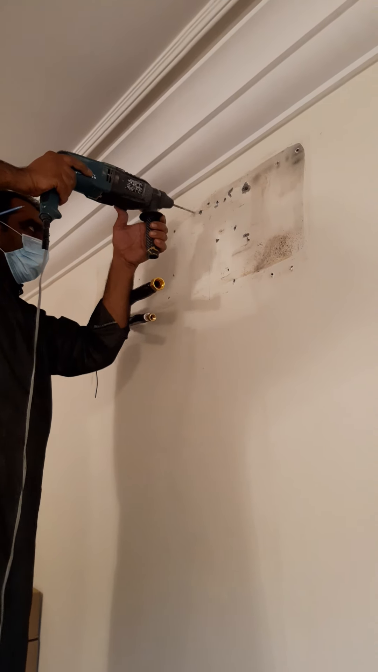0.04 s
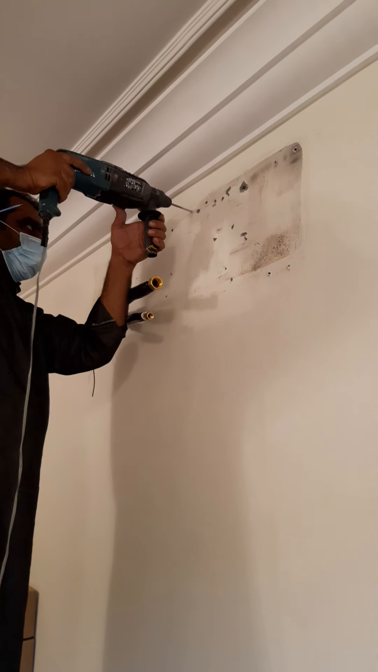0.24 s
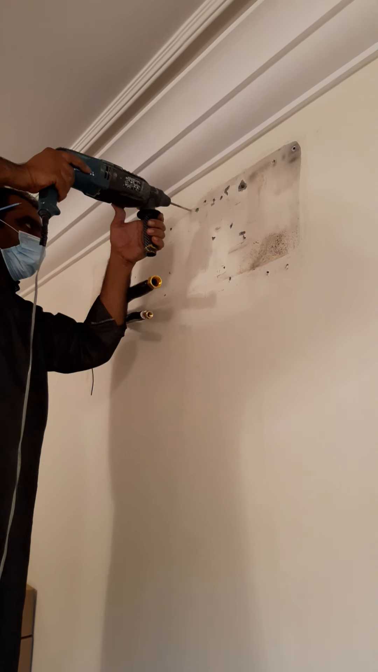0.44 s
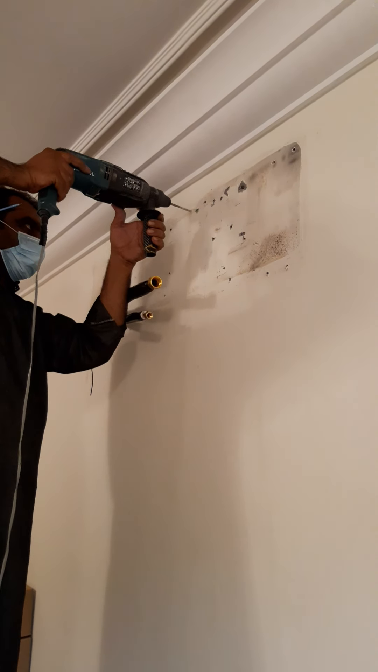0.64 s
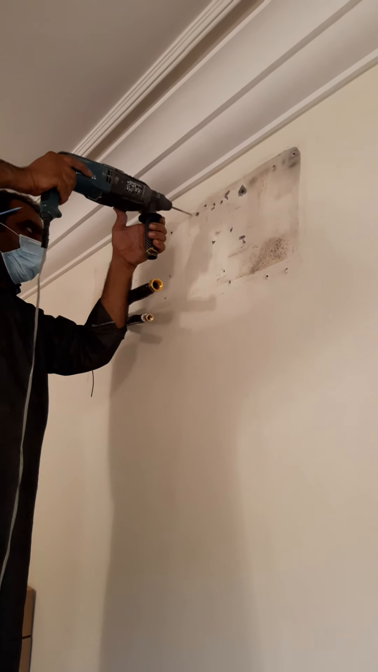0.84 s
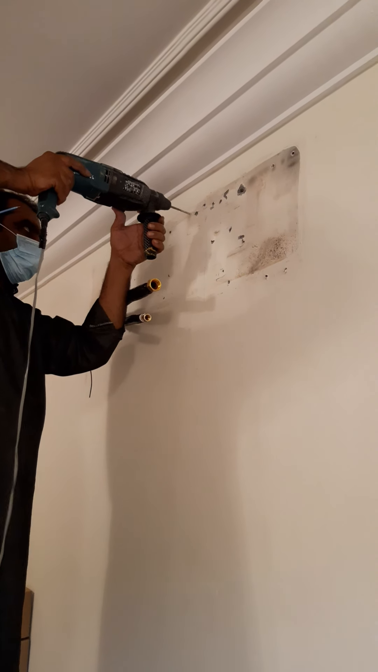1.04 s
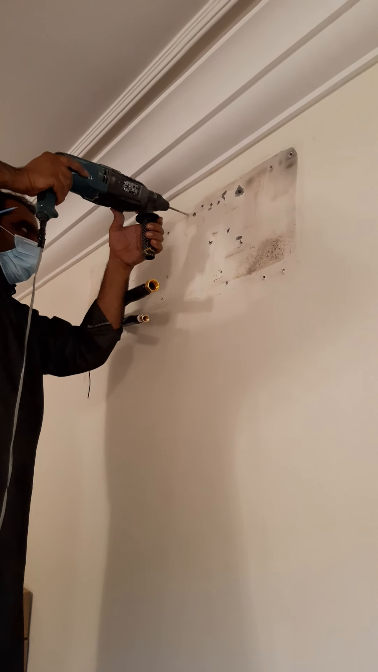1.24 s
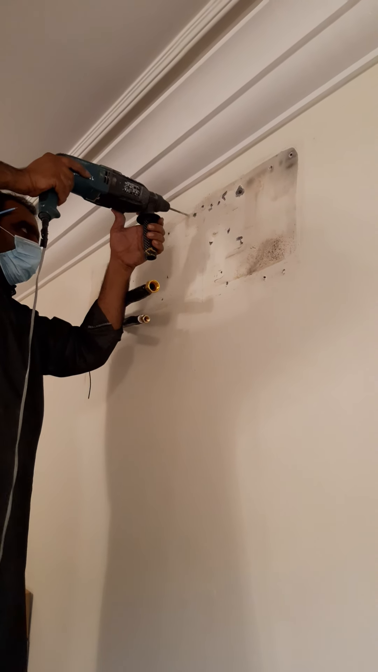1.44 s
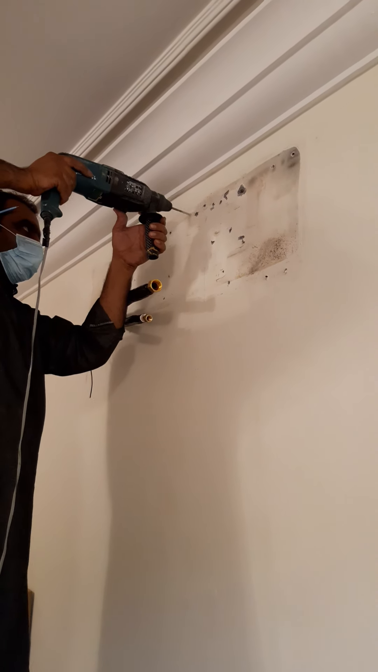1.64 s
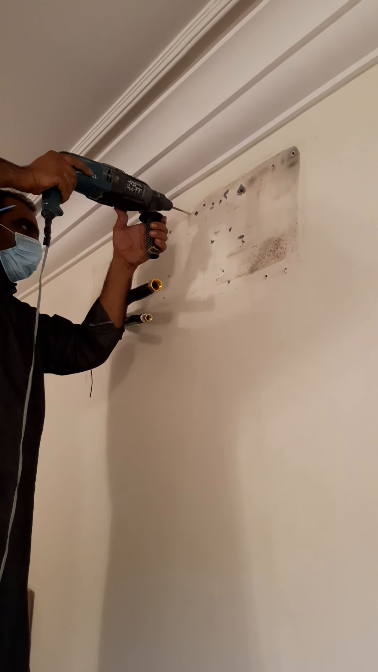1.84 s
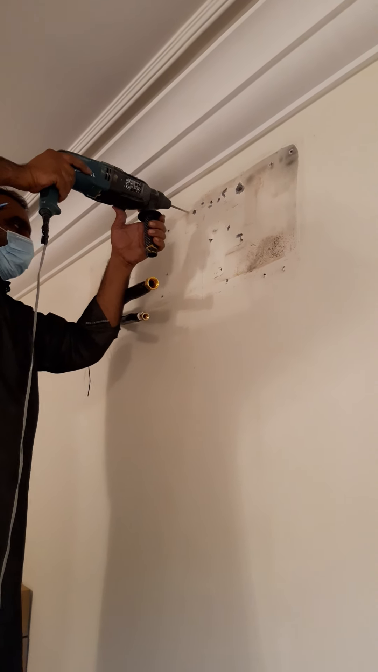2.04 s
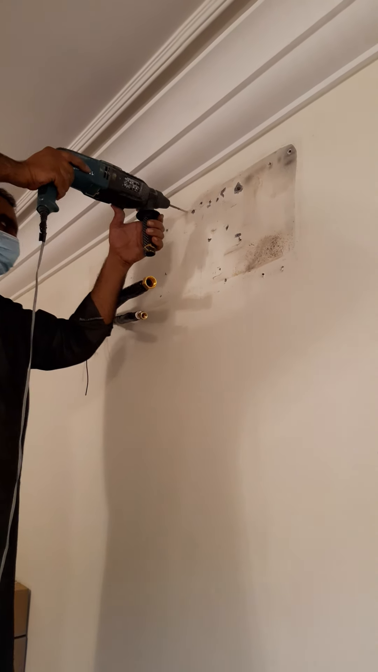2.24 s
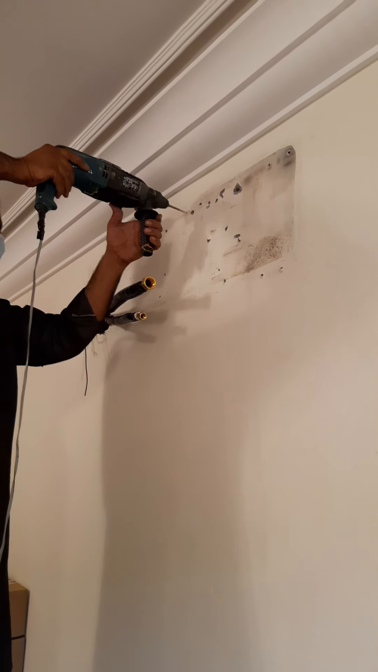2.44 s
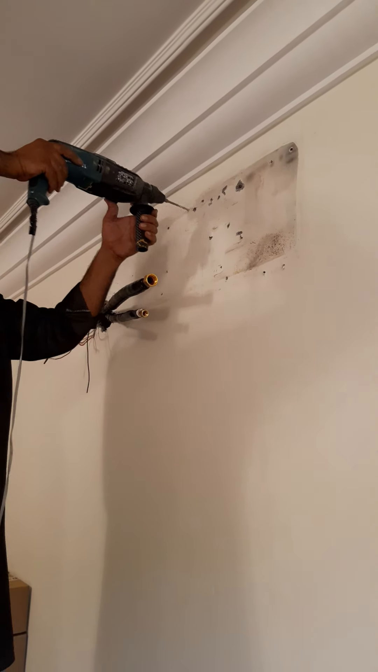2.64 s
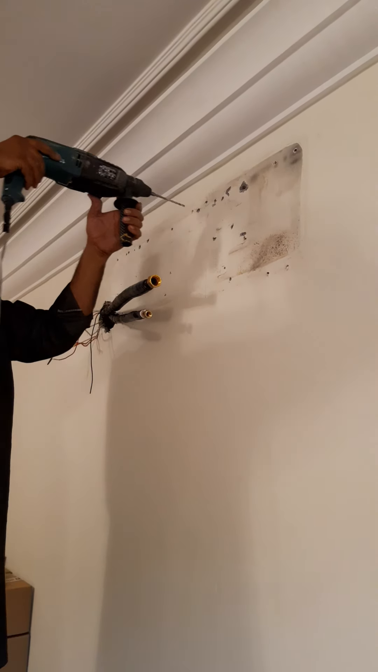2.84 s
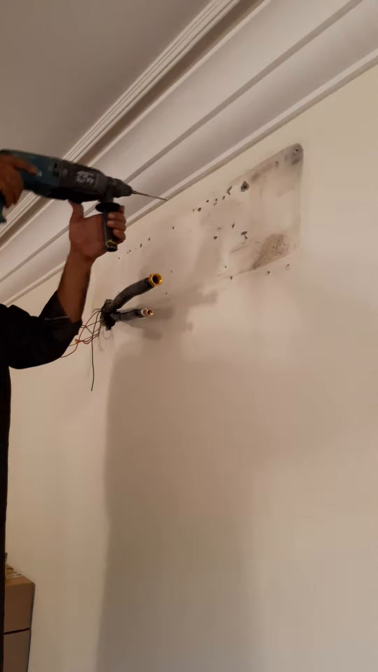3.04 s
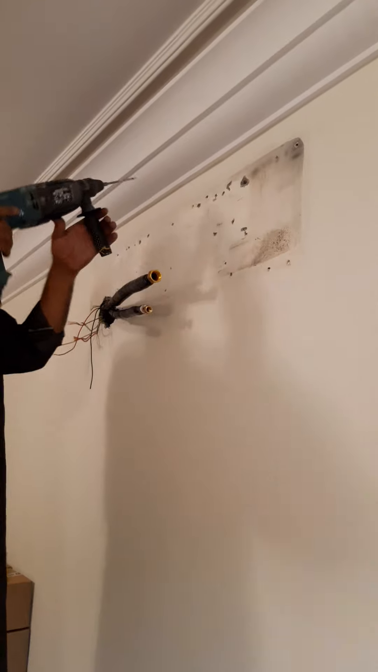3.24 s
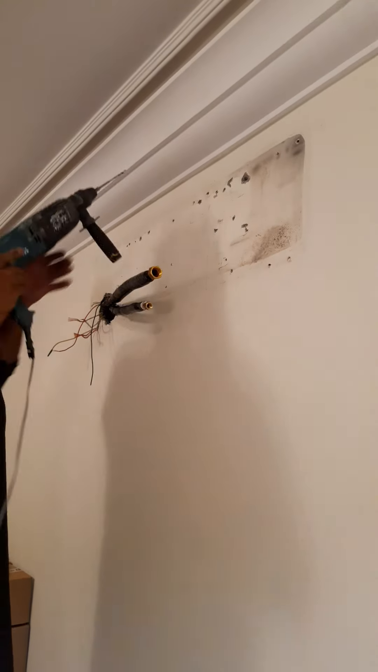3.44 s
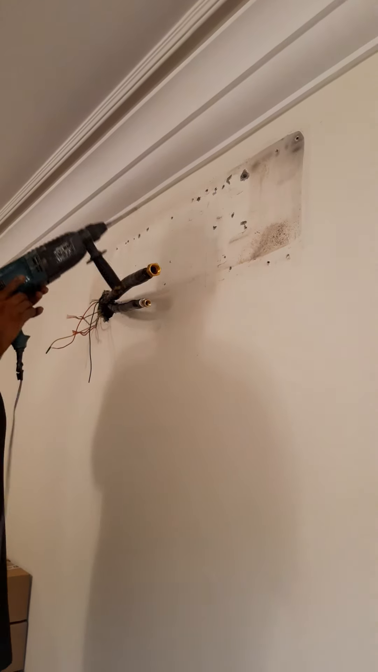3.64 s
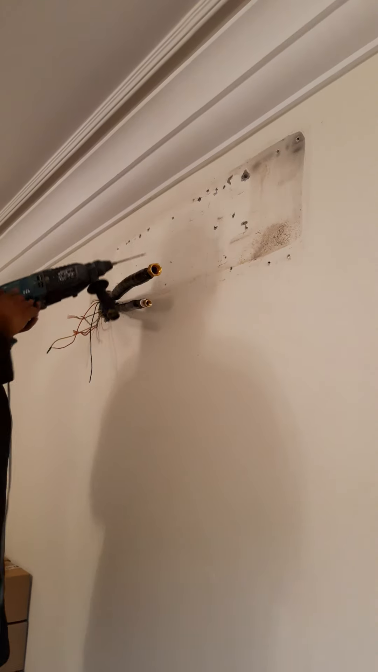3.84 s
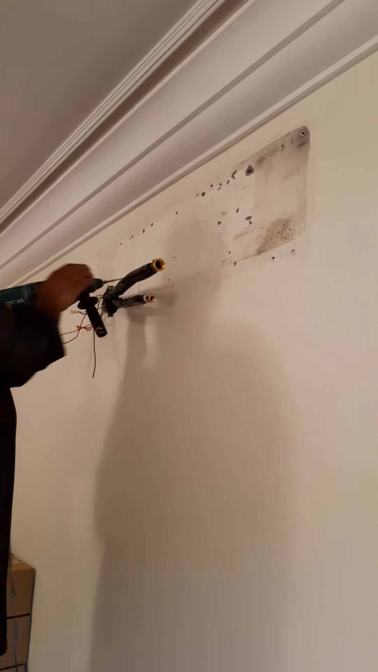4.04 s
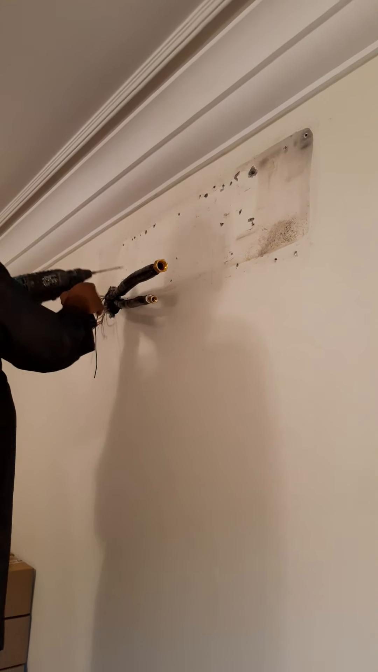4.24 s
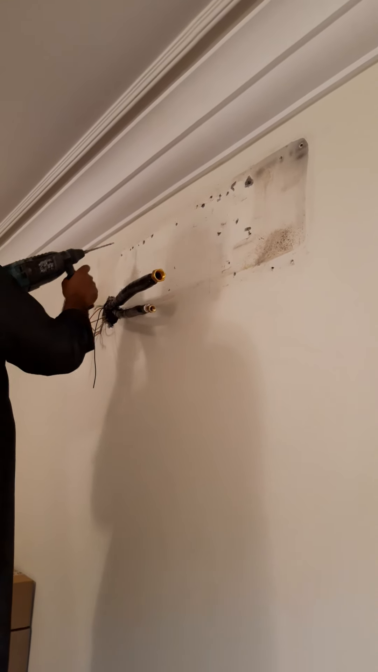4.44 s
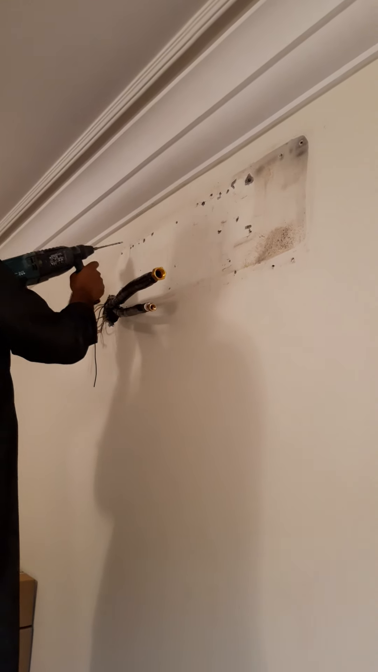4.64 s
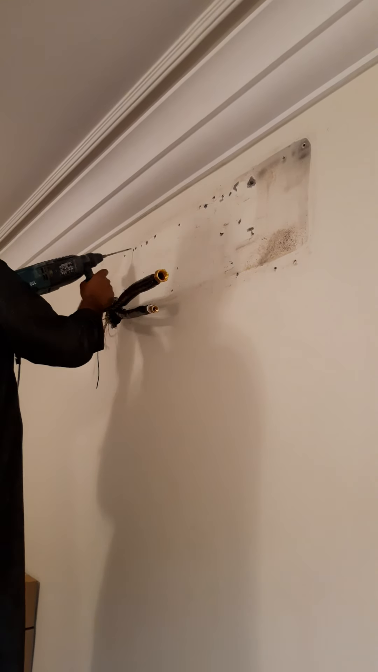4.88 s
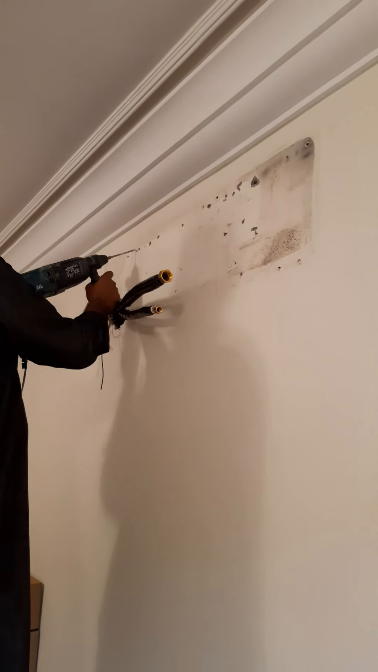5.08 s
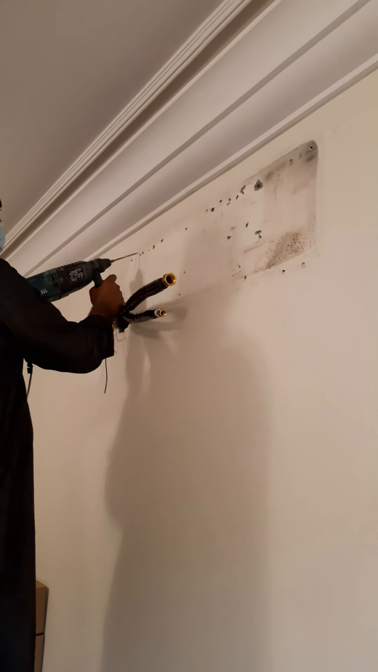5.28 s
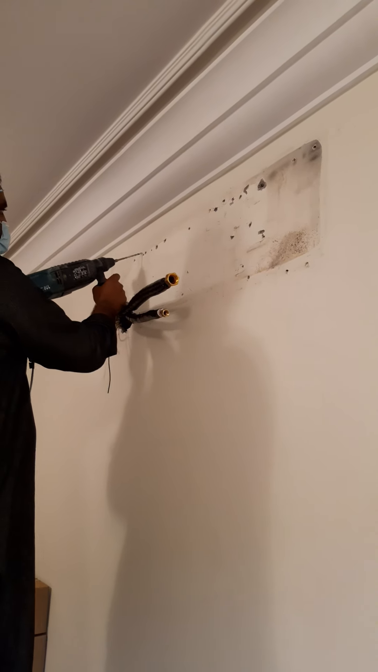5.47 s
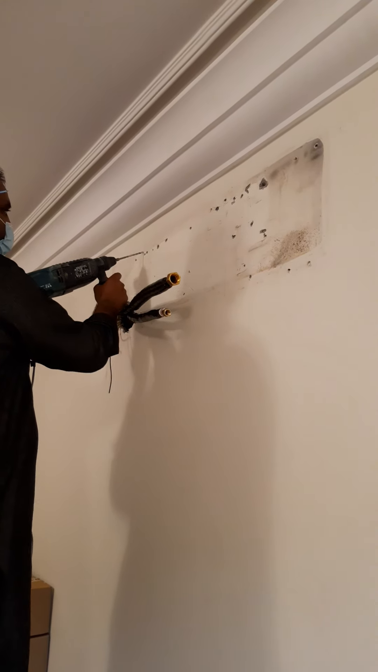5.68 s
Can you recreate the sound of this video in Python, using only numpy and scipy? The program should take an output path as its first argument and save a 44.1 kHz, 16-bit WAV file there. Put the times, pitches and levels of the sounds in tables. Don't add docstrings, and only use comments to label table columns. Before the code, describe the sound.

Loud rattling masonry drilling for about two and a half seconds, a trigger click, a falling motor whirr, then faint footwork on a hard floor.

```python
import sys
import numpy as np
from scipy import signal
from scipy.fft import rfft, irfft, next_fast_len
from scipy.io import wavfile
from scipy.ndimage import map_coordinates

SR = 44100
rng = np.random.default_rng(int(sys.argv[2]) if len(sys.argv) > 2 else 0)


def invert_db(level):
    return 10 ** (np.asarray(level, dtype=float) / 20)


def master(y):
    cut = np.clip(np.atleast_2d(y).T, -1, 1)
    pcm = np.round(cut * 32767)
    wavfile.write(sys.argv[1], SR, pcm.astype(np.int16))


N = 251811
T = np.arange(N) / SR
RELEASE_S = 2.45
RELEASE_HZ = 61
LINGER_S = 0.68
PANEL_HZ = 246.2


def unit(x):
    return x / np.sqrt(np.mean(x ** 2) + 1e-20)


def along(points, hz):
    f, v = np.transpose(points)
    return np.interp(np.log(hz + 1), np.log(f + 1), v)


def curves(rows):
    s, *cols = np.transpose(rows)
    return [np.interp(T, s, c) for c in cols]


def wobble(rate):
    coarse = T[::32]
    knots = rng.standard_normal(int(N * rate / SR) + 4)
    return np.interp(T, coarse, map_coordinates(knots, [coarse * rate]))


def noise(*shape):
    return rng.standard_normal(shape)


def filtered(x, response):
    n = x.shape[-1]
    m = next_fast_len(n + 8192)
    return irfft(rfft(x, m) * response(np.fft.rfftfreq(m, 1 / SR)), m)[..., :n]


# (pitch_hz, likeness 0 to 1)
PORT_LIKENESS = [(40, 0.43), (130, 0.88), (300, 0.76), (640, 1), (1400, 0.23), (3000, 0.14), (15000, .12)]
# (pitch_hz, left_minus_right_db)
DRILL_LEAN = [(60, -5), (110, -7.5), (200, -0.5), (380, -1.5), (700, -0.5), (1290, -6.5), (2380, -5),
              (4400, -2), (8120, 2.5), (15000, 4)]


def ports(pair, lean=DRILL_LEAN, lead=0.000257):
    def mix(hz):
        turn = np.arccos(np.clip(along(PORT_LIKENESS, hz), 0, 1)) / 2
        return np.array([np.cos(turn), np.sin(turn)])

    side = np.array([[1], [-1]])

    def place(hz):
        return invert_db(side * along(lean, hz) / 2) * np.exp(1j * np.pi * side * lead * hz)

    a, b = filtered(pair, mix)
    return filtered(np.array([a + b, a - b]), place)


# (pitch_hz, time_to_die_60_db_s)
ROOM_RING = [(150, 0.85), (1000, 0.78), (3000, 0.67), (7000, .5), (15000, .3)]


def room(x, direct_db):
    hz, t, z = signal.stft(noise(2, 2 * SR // 3), SR, nperseg=256)
    fade = invert_db(-60 * t / along(ROOM_RING, hz)[:, None])
    tail = signal.istft(z * fade, SR, nperseg=256)[1]
    build_up = np.clip(np.arange(tail.shape[1]) / SR / 0.0048, 0, 1)
    tail = tail / np.linalg.norm(tail[0]) * build_up
    tail[:, 0] = invert_db(direct_db)
    return signal.fftconvolve(x[None], tail, axes=1)


# (start_s, four_times_blow_rate_hz, push_db)
HAMMERING = [(0.0, 244.9, -16.5), (0.33, 246.4, -17), (0.48, 251.2, -16), (0.78, 255.3, -17),
             (0.99, 255.3, -17), (1.36, 251.4, -16.5), (1.52, 244.9, -17), (2.33, 249.2, -17),
             (2.45, 244.2, -17)]


def hammering():
    return curves(HAMMERING)


def coasting():
    drag_s, rub_hz = .87, 26
    slowing = np.exp(-np.clip(T - RELEASE_S, 0, 9) / drag_s)
    return np.clip((RELEASE_HZ + rub_hz) * slowing - rub_hz, 0, None)


def pressing():
    return invert_db(-60 * np.clip(T - RELEASE_S, 0, 9) / LINGER_S)


# (middle_s, dip_db, half_length_s)
GRIP_LOSSES = [(0.092, -2.5, 0.038), (.28, -1.5, 0.021), (.435, -3.5, 0.017), (0.608, -0.5, 0.019),
               (0.819, -1.5, 0.052), (0.992, -2, .025), (1.437, -6, 0.011), (1.54, -1, 0.063),
               (1.703, -1.5, 0.015), (1.937, -1, 0.022), (2.086, -3, 0.028), (2.434, -3.5, .02),
               (2.484, -2.5, .01)]


def slips():
    return sum(db * np.exp(-np.square(np.square((T - s) / half))) for s, db, half in GRIP_LOSSES)


def loudness(hammer_db, slip_share, fade_speed, coast_db, speed_power, extra_db=0):
    push_db = hammering()[1]
    spin = (T > RELEASE_S) * invert_db(2 * coast_db) * (coasting() / RELEASE_HZ) ** (2 * speed_power)
    keep = invert_db(-120 * fade_speed / LINGER_S / SR)
    spin = signal.lfilter([1 - keep], [1, -keep], spin)
    hammer = invert_db(2 * (push_db + hammer_db + extra_db)) * pressing() ** (2 * fade_speed)
    return invert_db(slip_share * slips()) * np.sqrt(hammer + spin)


# (pitch_hz, width_hz, level_db)
SHELL = [(766, 36, 8.5), (1350, 53, -8), (2270, 660, 10.5), (6500, 1500, -2), (11030, 5800, -14)]


def housing(hz, between):
    return between + sum(invert_db(db) * 1j * hz * w / (c * c - hz * hz + 1j * hz * w) for c, w, db in SHELL)


def grinding(turns):
    blow = 1.7 * np.exp(-(turns % 1) / 0.034) * invert_db(2.3 * wobble(60))
    rebound = 0.45 * np.exp(-((turns - .75) % 1) / 0.12)
    unsteady = invert_db(0.9 * wobble(25) + wobble(200))
    return unit((1 + blow + rebound) * unsteady * noise(2, N))


# (pitch_hz, level_db per Hz)
POUNDING_COLOR = [(290, -31), (500, -9.5), (538, -13), (773, -3), (946, -5.5), (1400, -0.5), (1530, -4),
                  (2160, -4.5), (2430, -7.5), (3750, -4.5), (4530, -9), (6420, -10), (7860, -22),
                  (14500, -18), (16000, -24.5)]


def pounding(turns, grit):
    at = np.flatnonzero(np.diff(np.floor(turns + .004 * wobble(40))) > 0)
    strikes = np.zeros(N)
    strikes[at] = invert_db(1.3 * noise(len(at)))
    rung = unit(filtered(room(strikes, direct_db=-6)[:, :N], lambda hz: hz > 560))

    def color(hz):
        return invert_db(along(POUNDING_COLOR, hz)) * housing(hz, between=4.2)

    return unit(filtered(0.54 * rung + grit, color))


# (pitch_hz, level_db per Hz)
WHIRR_COLOR = [(290, -48), (500, -17.5), (698, -5), (750, -3), (919, -6), (1180, -6.5), (1400, -5),
               (1600, -4), (2290, -7), (4870, -14), (6330, -15), (7750, -28), (11000, -25.5), (13100, -26),
               (16000, -40.5)]


def whirring():
    def color(hz):
        return invert_db(along(WHIRR_COLOR, hz)) * housing(hz, between=3.5)

    return unit(filtered(invert_db(0.63 * wobble(30) + 0.91 * wobble(120)) * noise(2, N), color))


def body_loudness():
    return loudness(hammer_db=0, slip_share=1, fade_speed=1, coast_db=-24.5, speed_power=1.39)


def body(both):
    whole = unit(filtered(both, lambda hz: (hz >= 520) * (hz < 7650)))
    bright = filtered(whole, lambda hz: np.clip((hz - 2500) / 2000, 0, 1))
    bright_gain = loudness(hammer_db=0, slip_share=1.07, fade_speed=1.4, coast_db=-23, speed_power=1.47)
    return body_loudness() * (whole - bright) + bright_gain * bright


def hiss(both, pound):
    dust_db = 3 * np.exp(-(T / .25) ** 2)

    def top(hz):
        return np.clip((hz - 11000) / 3000, 0, 1)

    lower = unit(filtered(both, lambda hz: (hz > 7650) * (1 - top(hz))))
    upper = unit(filtered(ports(pound), top))
    lower_gain = loudness(hammer_db=-15.5, slip_share=0.96, fade_speed=1.2, coast_db=-34.5,
                          speed_power=2.04, extra_db=dust_db)
    upper_gain = loudness(hammer_db=-14.5, slip_share=0.6, fade_speed=.9, coast_db=-41,
                          speed_power=2, extra_db=dust_db)
    return lower_gain * lower + upper_gain * upper


def vent(both):
    sing_at_hz, span_hz = 20, 7
    air = unit(filtered(both, lambda hz: np.exp(-((hz - 10500) / 1500) ** 2)))
    swell = np.exp(-(np.log(coasting() / sing_at_hz + 1e-9) * sing_at_hz / span_hz) ** 2)
    return invert_db(-50.5 + 2 * wobble(25)) * swell * air


# (pitch_hz, level_db per Hz)
RUMBLE_COLOR = [(25, -37), (70, -23), (120, -17.5), (190, -17.5), (250, -2), (340, -5), (540, -6),
                (600, -27), (900, -91)]


def rumble(grit):
    wall = unit(ports(filtered(grit, lambda hz: invert_db(along(RUMBLE_COLOR, hz)))))
    floor = unit(filtered(noise(2, N), lambda hz: (hz > 45) * (hz < 110) * hz))
    gain = loudness(hammer_db=-20.5, slip_share=0.5, fade_speed=.6, coast_db=-36, speed_power=2)
    return gain * (wall + invert_db(-26.5) * floor)


# (multiple of the blow rate, level_db)
WALL_HUM = [(1, -28), (2, -17.5), (3, -20), (4, 0), (5, -6), (6, -7.5), (7, -8), (8, -9), (9, -20),
            (10, -15), (11, -16.5), (12, -11), (13, -17), (14, -8)]
HUM_SWAY = [0.5, 0.2, 1.5, 0.1, 1.5, -0.5, -3, 2, 2.1, 2, -3.5, 4.5, -5, -2]
EASE_S = .045


def wall_hum(turns):
    fourth, push_db = hammering()
    panel_db = push_db - 10.5 - 10 * np.log10(1 + ((fourth - PANEL_HZ) / 3.94) ** 2)
    hum = 0
    for (k, db), sway_db in zip(WALL_HUM, HUM_SWAY):
        k = round(k)
        level_db = -32.5 + db + sway_db * (fourth / 4 - 62.3) + 1.7 * wobble(7.78)
        if k == 4:
            level_db = panel_db
        drift = (0.13 + .05 * k) * np.array([wobble(6.05), wobble(8.8)])
        start = 6 * rng.random() + np.array([[0], [np.pi / 2]])
        hum = hum + invert_db(level_db) * np.sin(2 * np.pi * k * turns + drift + start)
    easing = invert_db(-150 * np.clip(T - RELEASE_S + EASE_S, 0, 1))
    return np.sqrt(2) * hum * easing * body_loudness() / invert_db(push_db)


def panel_ring():
    since = T - RELEASE_S
    tone = unit(filtered(noise(N), lambda hz: 1 / (1 + ((hz - PANEL_HZ) / 16) ** 2)))
    fade = invert_db(-32 - 60 * since / .85 * (since > 0))
    return fade * np.clip(since / EASE_S + 1, 0, 1) * tone


# (multiple of the shaft speed, level_db, resonance_hz, width_hz)
WHINES = [(48.5, -37.5, 1600, 400), (66, -40, 2200, 350), (75.5, -40, 1420, 150), (123, -46, 1430, 140),
          (158, -48, 6700, 500), (465, -55, 10800, 900)]


def gear_whine(turns):
    coast = coasting()
    whine = 0
    for k, db, hz, width in WHINES:
        crossing = np.exp(-((k * coast - hz) / width) ** 4)
        tone = np.sin(2 * np.pi * k * turns + 1.5 * wobble(40))
        whine = whine + invert_db(db + 3 * wobble(35)) * crossing * tone
    return .5 * room(whine * (T > RELEASE_S), direct_db=10)[:, :N]


def drill():
    turns = np.cumsum(np.where(T < RELEASE_S, hammering()[0] / 4, coasting())) / SR
    grit = grinding(turns)
    pound = pounding(turns, grit)
    pressed = pressing()
    both = ports(pressed * pound + np.sqrt(1 - pressed ** 2) * whirring())
    rough = body(both) + hiss(both, pound) + vent(both) + rumble(grit) + panel_ring()
    tones = np.array([[1.5], [.12]]) * wall_hum(turns) + gear_whine(turns)
    return rough + ports(tones)


# (pitch_hz, level_db per Hz)
HUSH_COLOR = [(20, -21.5), (70, -1), (130, -1), (250, -7), (700, -6), (1800, -7.5), (2800, -20),
              (6000, -24), (10000, -26), (15900, -22.5)]
# (time_s, level_db)
HUSH_LEVEL = [(0, -72.5), (3.7, -72), (4.2, -67.5), (5.2, -66), (5.4, -70), (5.71, -71)]
# (pitch_hz, left_minus_right_db)
FLOOR_LEAN = [(60, -1.5), (110, -7.5), (200, -5.5), (380, -5.5), (700, -1.5), (1290, -8.5), (2380, -8),
              (4400, -3.5), (8120, -5), (15000, 0)]


def quiet():
    hush = filtered(noise(2, N), lambda hz: invert_db(along(HUSH_COLOR, hz)))
    return invert_db(curves(HUSH_LEVEL)[0] + .6 * wobble(3.2)) * unit(ports(hush, FLOOR_LEAN))


def thump():
    t = np.clip(T - .785, 0, 1)
    return invert_db(-33) * np.sin(2 * np.pi * 100 * t) * invert_db(-60 * t / .09)


def on_floor(hits):
    out = np.zeros((2, N + 2 * SR))
    for s, wet in hits:
        out[:, round(s * SR):][:, :wet.shape[1]] += wet
    return ports(out[:, :N], FLOOR_LEAN, lead=-.0002)


# (start_s, peak_db, pitch_hz, crack_minus_ring_db, top_minus_ring_db)
# the top band's level is taken relative to the crack by subtracting crack_minus_ring_db
CONTACTS = [(2.5485, -16, 1383, -6, -17), (3.237, -38.5, 2395, -7, -18), (3.5872, -48.5, 2140, -21, -29.5),
            (3.6394, -52.5, 2080, -4, -14.5), (3.8442, -46, 2110, -18, -23), (3.8641, -44, 2420, -3, -9),
            (4.0344, -44, 2250, -8, -16), (4.0647, -38.5, 2270, -8, -27), (4.3545, -35.5, 2310, -11.5, -33),
            (4.4338, -30, 2745, -8.5, -24), (4.8364, -40.5, 1810, -10.5, -31),
            (4.9846, -49, 1770, -13, -26), (5.0814, -50, 1750, -24, -40)]


def ticks():
    t = np.arange(SR // 3) / SR
    hits = []
    for s, db, pitch_hz, crack_db, top_db in CONTACTS:
        def color(hz):
            return (hz > 1200) * np.where(hz < 7500, 1, invert_db(top_db - crack_db))

        crack = filtered(noise(len(t)), color)
        ring = invert_db(-60 * t / .04) * np.sin(2 * np.pi * pitch_hz * t)
        envelope = np.clip(t / 0.0018, 0, 1) * invert_db(-60 * t / 0.044)
        knock = envelope * (1.1 * ring + invert_db(crack_db + 2.5) * crack)
        hits.append((s, invert_db(db + 3.5) * room(knock, direct_db=4)))
    return on_floor(hits)


# (start_s, pitch_hz, level_db, length_s)
FAINT_RINGS = [
    (2.74, 756, -41.5, .6),
    (3.24, 986, -57, .22),
    (3.91, 12610, -74, .05),
    (3.98, 8555, -71, .08),
    (4.125, 656, -57, .09),
    (4.885, 453, -59, .14),
]


def rings():
    tones = 0
    for s, hz, db, length in FAINT_RINGS:
        swell = np.clip((T - s) / .01, 0, 1) * np.clip((s + length - T) / length, 0, 1)
        tones = tones + invert_db(db + 3.5 * wobble(40)) * swell * np.sin(2 * np.pi * hz * T + wobble(33))
    return ports(np.array([tones, .5 * tones]), FLOOR_LEAN)


# (start_s, level_db, length_s, brightness_db per octave)
SHOE_SCUFFS = [(3.491, -61.5, .09, 2), (3.595, -59, .13, 2.5), (3.87, -52.5, 0.18, 4),
               (4.063, -39.5, 0.025, 1), (4.121, -57, 0.29, 2), (4.35, -49.5, 0.039, 1.5),
               (4.429, -37.5, 0.037, 0), (4.491, -44.5, 0.091, 3), (4.831, -51.5, 0.058, 1.5),
               (4.881, -51, .06, -3.5), (4.942, -52.5, 0.067, -2.5), (5.258, -71.5, 0.0643, -4.5)]
# (pitch_hz, level_db per Hz)
SOLE_COLOR = [(59, -37), (100, -13), (202, -21), (302, -4), (398, -10), (452, 0.5), (492, -5.5),
              (836, -3.5), (1420, -9), (2040, -4.5), (3250, -14.5), (4980, -20), (7770, -32),
              (12700, -35.5), (16000, -35)]


def scuffs():
    t = np.arange(SR // 3) / SR
    hits = []
    for s, db, length, tilt_db in SHOE_SCUFFS:
        def color(hz):
            tilt = tilt_db * np.log2(np.maximum(hz, 600) / 1500)
            return invert_db(along(SOLE_COLOR, hz) + tilt) / (1 + (440 / (hz + 1)) ** 4)

        grain = invert_db(4 * noise(len(t) // 60 + 1)).repeat(60)[:len(t)]
        rub = unit(filtered(grain * noise(len(t)), color))
        envelope = np.clip(t / 0.0013, 0, 1) * np.clip((length - t) / 0.019, 0, 1)
        hits.append((s, invert_db(db + 0.5) * room(rub * envelope, direct_db=-4)))
    return on_floor(hits)


def scene():
    return drill() + quiet() + thump() + ticks() + rings() + scuffs()


def roll_off(x):
    return signal.sosfilt(signal.butter(12, 17000, fs=SR, output="sos"), x)


def record(dry):
    soft = dry / (1 + np.abs(dry / .95) ** 4) ** .25

    def band_limit(hz):
        return np.sin(np.pi / 2 * np.clip((15950 - hz) / 300, 0, 1)) ** 2

    return roll_off(filtered(soft, band_limit))


dry = scene()
out = record(dry)
master(out)
```